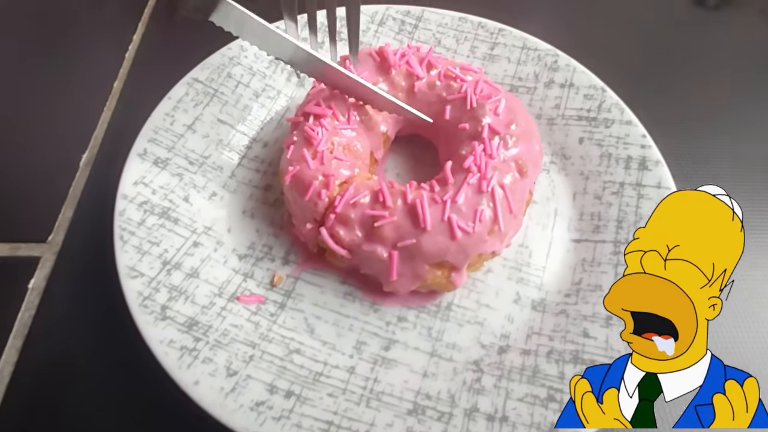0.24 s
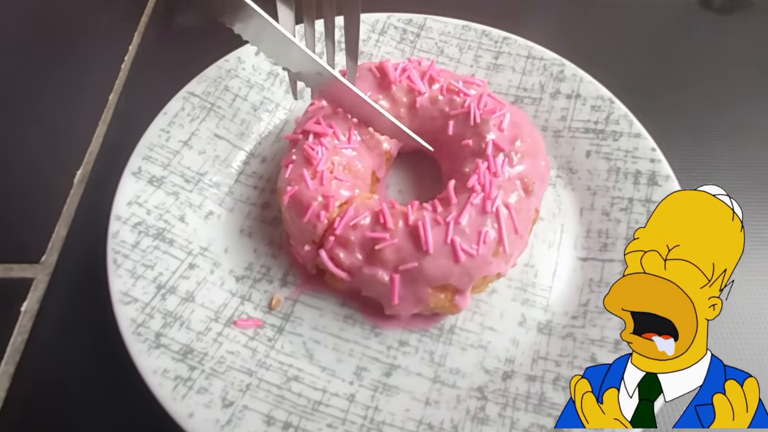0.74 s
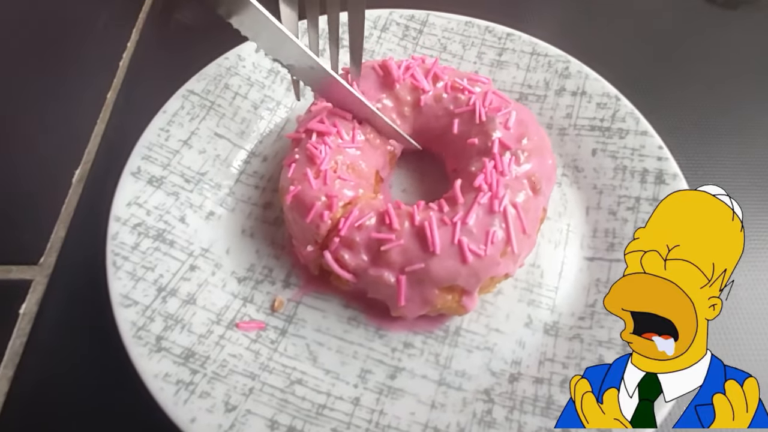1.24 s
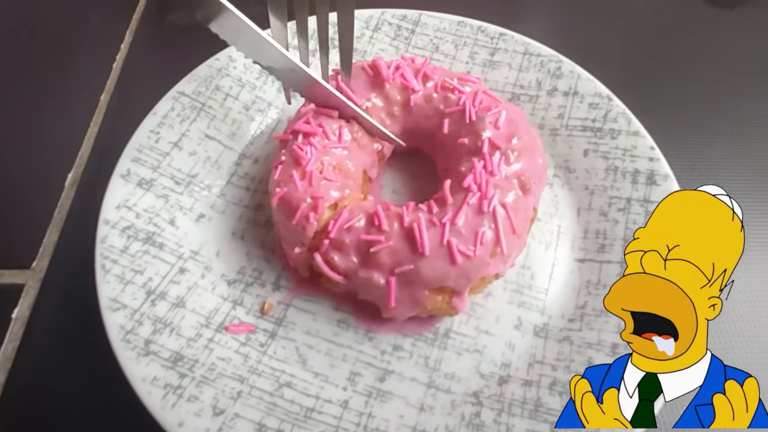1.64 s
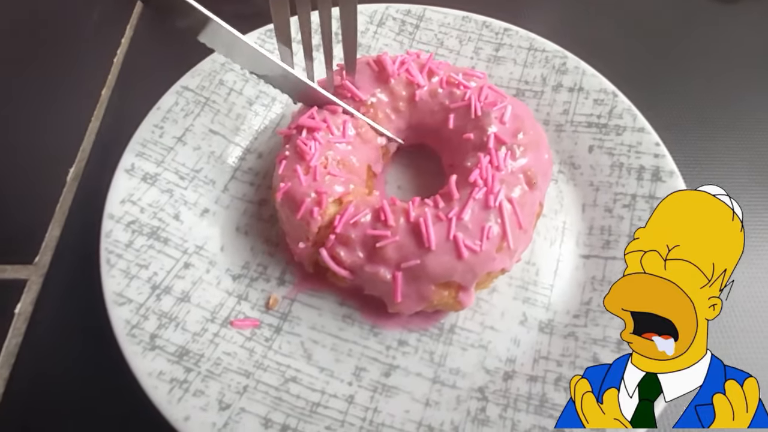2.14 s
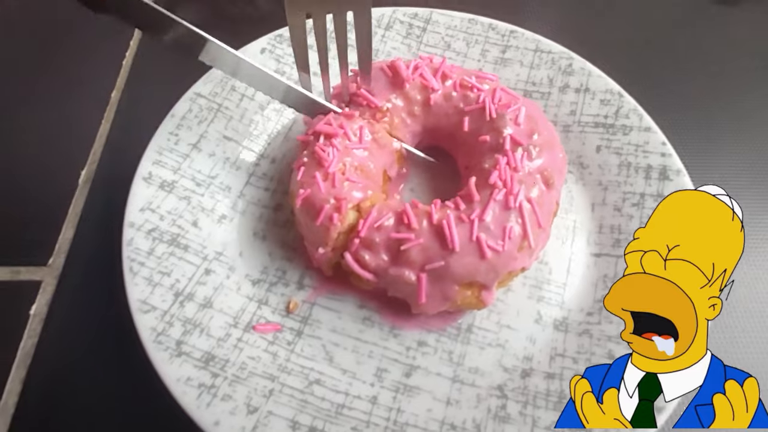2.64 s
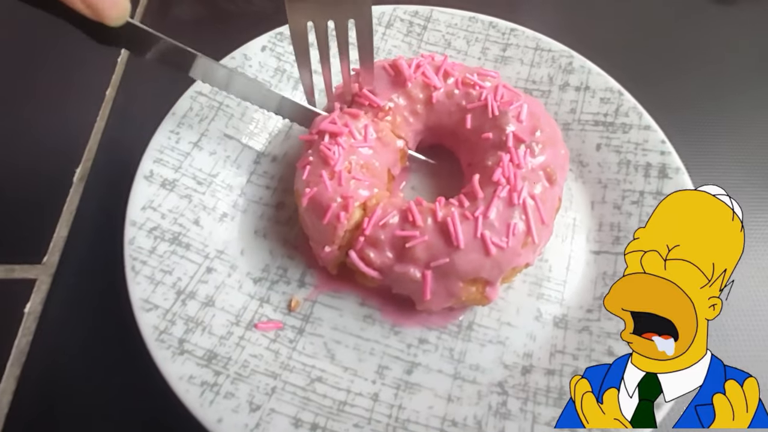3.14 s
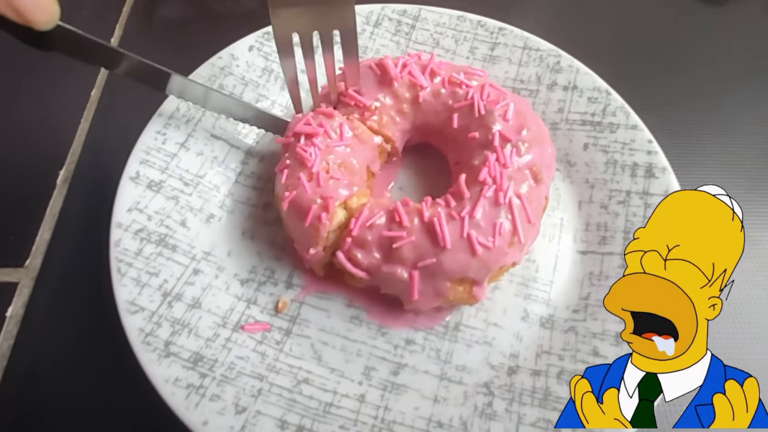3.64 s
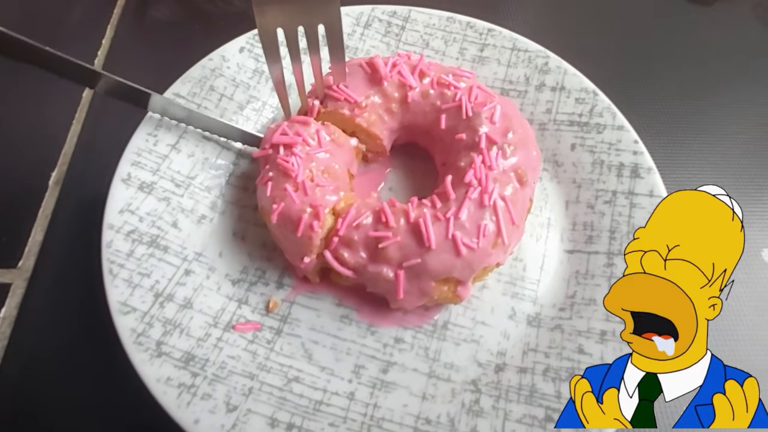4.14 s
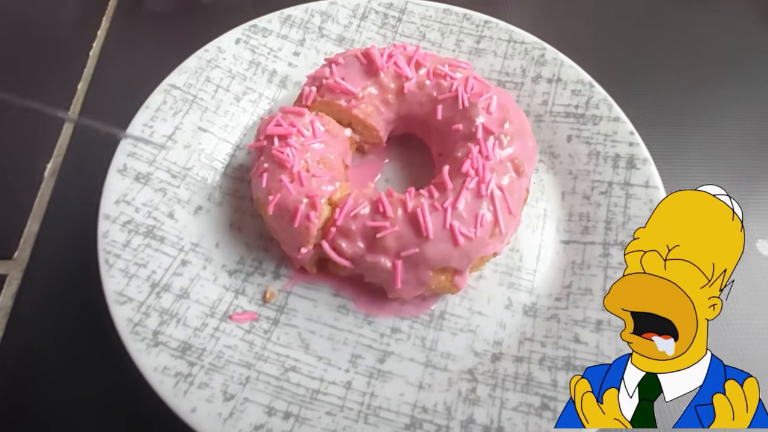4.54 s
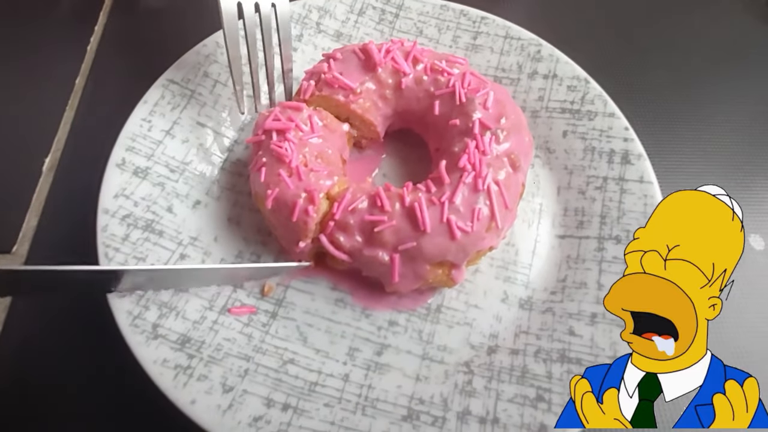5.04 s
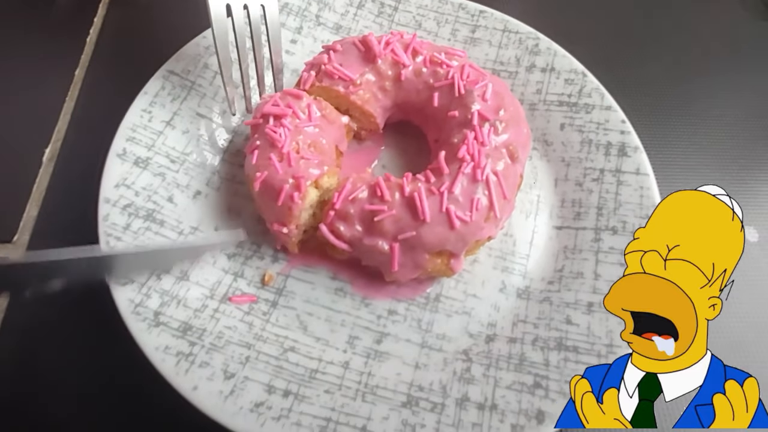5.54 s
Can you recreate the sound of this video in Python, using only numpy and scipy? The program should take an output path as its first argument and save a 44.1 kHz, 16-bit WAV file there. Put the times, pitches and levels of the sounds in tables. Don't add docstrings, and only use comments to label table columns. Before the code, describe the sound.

A knife cuts a sprinkled donut on a plate: quiet grains, a burst of brittle crunches, a loud ceramic clack, light drags, two groups of firm knocks and a bright stuttering scrape. A light ringing tap and faint metal brush end the cutting. Near microphones, short kitchen echo, low air noise with a faint distant fan.

```python
import sys
import numpy as np
from scipy import signal
from scipy.fft import rfft, irfft
from scipy.io import wavfile
from scipy.ndimage import uniform_filter1d

SR = 44100
rng = np.random.default_rng(int(sys.argv[2]) if len(sys.argv) > 2 else 0)


def to_linear_factor(level_db):
    exponent = np.asarray(level_db, float) / 20
    return 10 ** exponent


def file_out(sig):
    cols = np.atleast_2d(sig).T
    lim = np.clip(cols, -1, 1)
    pcm = np.round(lim * 32767).astype(np.int16)
    wavfile.write(sys.argv[1], SR, pcm)


N = 255339
THROUGH_S = 2.4


def rms_one(x):
    return x / np.sqrt(np.mean(x ** 2) + 1e-20)


def at_hz(points, hz):
    points_hz, values = np.transpose(points)
    return np.interp(np.log(hz), np.log(points_hz), values)


def band_pass(x, low_hz, high_hz, order=2):
    return signal.sosfilt(signal.butter(order, [low_hz, high_hz], "band", fs=SR, output="sos"), x)


def ring(push, hz, t60_s):
    r, w = to_linear_factor(-60 / (t60_s * SR)), 2 * np.pi * hz / SR
    return signal.lfilter([0, np.sin(w)], [1, -2 * r * np.cos(w), r * r], push + 1e-18)


def dying(clicks, t60_s):
    return signal.lfilter([1], [1, -to_linear_factor(-60 / (t60_s * SR))], clicks)


def spikes(times_s, heights):
    out = np.zeros(N)
    np.add.at(out, (np.asarray(times_s) * SR).astype(int), heights)
    return out


def grains(per_s, spread_db):
    sizes = to_linear_factor(spread_db * np.minimum(rng.exponential(1, N), 4)) * rng.choice([-1, 1], N)
    return rms_one(sizes * (rng.random(N) < per_s / SR))


def bunching(depth_db, size):
    return to_linear_factor(depth_db * rms_one(uniform_filter1d(rng.standard_normal(N), size=size)))


def swells(rows):
    level, top, time = np.full(N, -120.), np.zeros(N, int), np.arange(N) / SR
    for k, (s, db, rise_s, fall_s, *_) in enumerate(rows):
        before, after = (s - time) / max(rise_s, .002), (time - s) / max(fall_s, .002)
        swell = db - 20 * np.where(time < s, before, after)
        top[swell > level] = k
        level = np.maximum(level, swell)
    return level, top


def dying_noise(times_s, db, t60_s, low_hz, high_hz):
    fade = dying(spikes(times_s, to_linear_factor(db)), t60_s)
    return band_pass(fade * rng.standard_normal((2, N)), low_hz, high_hz)


def placed(x, pan_db, lag):
    late = np.interp(np.arange(len(x)) - lag, np.arange(len(x)), x, left=0)
    return np.array([x * to_linear_factor(pan_db / 2), late * to_linear_factor(-pan_db / 2)])


def coloured(pair, spectrum, leaning):
    hz = np.maximum(np.fft.rfftfreq(N, 1 / SR), 10)
    tilt_db = at_hz(leaning, hz) / 2 * [[1], [-1]]
    return rms_one(irfft(rfft(pair) * to_linear_factor(at_hz(spectrum, hz) + tilt_db), N))


def plate():
    # (time [s], level near 1 kHz [dB], clatter centre [Hz], rim ring [dB re blow],
    # hard edge [dB re blow])
    blows = [(1.616, -11.5, 917, 4, -11.5), (1.6208, -16, 1200, 1.5, -30.5), (1.633, -15, 1290, -13.5, -23),
             (2.084, -26.5, 1250, -13, -46), (2.096, -28.5, 1170, -54, -35), (2.121, -29.5, 1150, -45, -46),
             (2.434, -41.5, 1480, -35, -25), (2.611, -38.5, 1250, -7, -64), (2.62, -33, 1180, -16, -70),
             (2.93, -43, 1560, -5, -12), (3.035, -27, 1480, 3, -16), (3.0375, -13, 1480, -3, -25),
             (3.147, -26, 1240, 6, -22), (3.149, -12, 1300, -14, -42.5), (3.164, -21, 1060, -10.5, -26.5),
             (3.169, -25.5, 1180, -6.5, -45.5), (3.373, -15, 1250, -7, -19), (3.3757, -12.5, 1276, 1, -22),
             (3.382, -23.5, 1420, -21.5, -6.5), (3.411, -19, 1300, -16.5, -51),
             (3.536, -45.5, 1500, 7, -15), (3.547, -59, 1500, -8, -30), (3.802, -20, 1460, -5.5, -49),
             (3.8265, -18.5, 1310, -15, -34.5), (3.829, -15.5, 1154, -37.5, -41)]
    # (time [s], level near 1 kHz [dB], rise [s], fall [s], centre [Hz])
    presses = [(3.813, -25.5, 0.014, .02, 1450), (2.11, -59, 0.026, 0.049, 1150),
               (1.565, -45, 0.0023, 0.05, 1390), (1.597, -39.5, 0.043, 0.022, 1320),
               (1.887, -35.5, 0.025, 0.026, 1480), (1.967, -48, .004, 0.02, 1410),
               (2.442, -36, 0.025, 0.096, 1500), (2.475, -31.5, 0.084, 0.067, 1480),
               (2.51, -36.5, .015, 0.037, 1470), (2.134, -45, .02, 0.0093, 1250),
               (2.641, -44, 0.04, 0.08, 1290), (2.933, -38, 0.019, 0.045, 1500),
               (3.016, -34.5, 0.062, 0.0069, 1480), (3.19, -30, 0.0039, 0.0098, 1460),
               (3.246, -48, 0.3, 0.039, 1400), (3.804, -22, 0.0065, 0.038, 1330)]
    # (time [s], level near 2400 Hz [dB], rise [s], fall [s], 8 kHz hiss [dB re slide])
    slides = [(1.7, -33, .1, 0.13, -18), (3.2, -43.5, 0.086, 0.081, -4.5), (3.44, -28.5, 0.054, 0.12, -20),
              (3.537, -39.5, 0.014, 0.018, -5.5), (3.944, -45, .004, 0.018, 0),
              (3.972, -37, .004, 0.012, -3.5), (3.978, -33, 0.0035, 0.032, -1),
              (3.994, -37.5, .006, .02, 1), (4.004, -36, .004, 0.028, 12), (4.022, -36, .004, 0.023, -2),
              (4.033, -26.5, 0.015, 0.035, -15), (4.057, -34, .004, 0.033, -2), (4.07, -53, 0.018, 0.24, 0),
              (3.789, -36, 0.006, .02, -6), (3.827, -24.5, 0.011, 0.041, -9.5),
              (3.95, -38.5, .02, 0.16, -1.5), (3.999, -35, 0.11, 0.057, -6),
              (4.047, -31.5, 0.18, 0.024, -5.5)]
    drag_colour_db = [-7, -11, -19]
    slide_low_db, slide_mid_db, slide_hz = -21.5, -8.5, 1250

    s, db, centre_hz, rim_db, edge_db = np.transpose(blows)
    mid_db = 0.2 * rim_db + 0.36 * edge_db + 9
    (press, row), (slide, slide_row) = swells(presses), swells(slides)
    level = np.maximum(press, slide + slide_low_db)
    drag_hz = np.where(press >= level, np.array(presses)[row, -1], slide_hz)
    slide_colour_db = [0, slide_mid_db, np.array(slides)[slide_row, -1]]
    drags = [np.maximum(press + a, slide + b) for a, b in zip(drag_colour_db, slide_colour_db)]

    slips = np.abs(grains(3000, spread_db=5.0) * bunching(2.9, 400))
    rough = slips, rng.standard_normal(N), grains(2300, spread_db=-1.0)
    out = low_modes(s, db, centre_hz, level, drag_hz, rough)
    out += high_modes(s, [db + rim_db, db + mid_db, db + edge_db], drags, rough)
    out += contact(s, db + mid_db, db + edge_db)
    out = signal.sosfilt(signal.butter(4, 470, "high", fs=SR, output="sos"), out)
    worktop = dying_noise(s + 0.039, db - 16.0, 0.48, 140, 450)
    return out + worktop.mean(axis=0)


def low_modes(s, db, centre_hz, level, drag_hz, rough):
    # (mode [Hz], level [dB], t60 [s], left-right [dB])
    body = [(560, 2, 0.046, 2.5), (689, -4, 0.05, 3.5), (748, -1, 0.0066, 1), (854, -4.5, 0.06, 3.5),
            (1001, 2, 0.053, -4), (1108, -3.5, 0.06, 2.5), (1168, -5.5, 0.092, -0.5),
            (1209, -2.5, 0.08, 3.5), (1242, -4.5, 0.041, 6.5), (1300, 0.5, 0.07, -0.5),
            (1336, -0.5, 0.07, 2), (1390, -1.5, 0.056, 5.5), (1480, -0.5, 0.085, 11.5),
            (1577, -1.5, 0.045, 2.5), (1705, -2.5, 0.033, -4), (1883, -0.5, 0.023, 0)]
    out = np.zeros((2, N))
    for k, mode in enumerate(body):
        hz, sign = mode[0], (-1) ** k
        blow_db = db + pressed(hz, centre_hz, sharp_db=30.0, floor_db=-9.0 - 8.7 * (hz < 620))
        drag_db = level + pressed(hz, drag_hz, sharp_db=51.5, floor_db=-24)
        lag = 6.0 * sign * (900 < hz < 2000)
        out += fed_mode(mode, s, blow_db, drag_db, -14, .17, rough, sign=sign, lag=lag)
    return out


def pressed(hz, centre_hz, sharp_db, floor_db):
    octaves = np.log2(hz / centre_hz)
    main_db, partner_db = -sharp_db * np.abs(octaves), -sharp_db * np.abs(octaves + 0.77)
    return np.maximum(np.maximum(main_db, partner_db), floor_db)


def high_modes(s, blows_db, drags_db, rough):
    plate_hz = [2293, 2347, 2460, 2584, 2643, 3110, 3467, 3496, 3520, 3900, 4250, 4860, 6352, 6730, 7700,
                8010, 8400, 9825, 11835, 12920, 15555]
    # (level [dB], t60 [s], left-right [dB])
    plate_modes = [(-1, .25, 2), (-3, .3, 1), (-6, .025, 3), (-13, .35, 2), (-22, .25, 2), (-15, .03, 2),
                   (-13, .06, 4), (-9, .08, 4), (-11, .05, 5), (-5, .014, 1), (-5, .018, 1), (-20, .1, 2),
                   (-1, .16, 0), (-10, .015, -4), (-3, .008, -15), (-1, .2, -11), (-4, .01, -15),
                   (2, .15, -2), (-10, .1, -2), (0, .044, -2), (-15, .1, -2)]
    # (while cutting [dB], once through [dB])
    lying = [(-4, -2), (0.5, 5), (2, 0.5), (2, 3), (4.5, 12.5), (1, -3.5), (0.5, 2), (0.5, 4.5), (1, 4),
             (0, -0.5), (2, 6), (4.5, -5), (-3, -2.5), (6.5, 12), (-1.5, -2.5), (-1.5, -2), (0.5, -0.5),
             (-10.5, -6.5), (-13, -4.5), (1, -2.5), (0, 2)]
    # (time [s], peak [dB])
    catches = [
        (3.9425, -29),
        (3.962, -36),
        (3.9712, -30),
        (3.9766, -30),
        (3.992, -33),
        (4.0044, -30),
        (4.021, -29),
        (4.0336, -24),
        (4.041, -25.5),
        (4.057, -33),
    ]
    # catch [dB], rattle [dB], rattle t60 [s]
    catch_group_db, rattle_group_db, rattle_s = [-6, -8.5, -3], [-12, -20, -12], [.16, .08, .12]
    # skid's loss on long rings [dB], ring time left under the resting blade [ratio]
    skid_long_db, resting = [-6, -20, 0], [0.28, 1, 1]
    skid_s, skid_short_db, skid_top_db, top_hz = 3.9, -0.5, -9, 9000
    long_s, stiff_hz, stiff_db, catch_stiff_db = .045, 11000, -9, -15
    sing_hz, sing_db = 6350, 5

    time = np.arange(N)
    skid, through = time / SR > skid_s, time > int(THROUGH_S * SR)
    catch_s, catch_db = np.transpose(catches)
    out = np.zeros((2, N))
    for hz, (mode_db, t60_s, pan_db), (cutting_db, lying_db) in zip(plate_hz, plate_modes, lying):
        group = int(hz > 2800) + int(hz > 5500)
        is_long, is_stiff = t60_s > long_s, hz > stiff_hz
        blow_db = blows_db[group] + np.where(s > THROUGH_S, lying_db, cutting_db)
        skid_db = (skid_long_db[group] if is_long else skid_short_db) + skid_top_db * (hz > top_hz)
        drag_db = drags_db[group] + skid * skid_db + stiff_db * is_stiff
        drag_db = drag_db + np.where(through, lying_db, cutting_db)
        rattle_db = rattle_group_db[group] + stiff_db * is_stiff
        if abs(hz - sing_hz) < 200:
            blow_db, drag_db = blow_db + sing_db * (s > THROUGH_S), drag_db + sing_db
        caught_db = catch_db + mode_db + catch_group_db[group] - 15.3 * is_long + catch_stiff_db * is_stiff
        out += fed_mode((hz, mode_db, t60_s, pan_db), s, blow_db, drag_db, rattle_db, rattle_s[group], rough,
                        caught=spikes(catch_s, to_linear_factor(caught_db)), left=resting[group] if is_long else 1,
                        scattered=not is_long)
    return out


def fed_mode(mode, s, blow_db, drag_db, rattle_db, rattle_s, rough,
             sign=1, lag=0, caught=0, left=1, scattered=True):
    hz, mode_db, t60_s, pan_db = mode
    slips, noise, rattle = rough
    contact_s = .0012
    uneven, late = rng.standard_normal((2, len(s)))
    hits = spikes(s + contact_s * np.abs(late) * scattered, to_linear_factor(blow_db + mode_db - 4.0 + 1.8 * uneven))
    chatter = to_linear_factor(rattle_db) * dying(hits, rattle_s)
    drag = uniform_filter1d(to_linear_factor(drag_db + mode_db - 3.5), size=100)
    turn = rng.integers(N)
    fed = chatter * np.roll(rattle, turn) + drag * slips * np.sign(np.roll(noise, turn))
    fed = fed / np.sqrt(t60_s * SR / 14)
    push = sign * hits + fed + caught
    through = int(THROUGH_S * SR)
    tone = np.concatenate([ring(push[:through], hz, t60_s), ring(push[through:], hz, left * t60_s)])
    return placed(tone, pan_db, hz / 400 * rng.random() + lag)


def contact(s, mid_db, edge_db):
    out = dying_noise(s, mid_db + 10.0, 0.013, 1900, 2100)
    out += dying_noise(s, mid_db - 2.5, 0.1, 2100, 2800)
    out += dying_noise(s, mid_db - 15.0, 0.15, 3300, 3900)
    out += dying_noise(s, edge_db - 5.0, 0.012, 6300, 9500)
    return out + dying_noise(s, mid_db - 6.5, 0.026, 3700, 4500)


def rim_tap():
    # (time [s], level [dB], left-right [dB])
    tap = [
        (4.2872, -30.5, 0),
    ]
    rim_hz = [570, 1190, 1346, 2320, 3499, 3106, 4850, 6347, 6934, 8010, 9819, 11830, 12720]
    # (level [dB], t60 [s], left-right [dB], right lag [samples])
    rim = [(-20, 0.098, 2, -1), (-15, 0.23, 5, -7), (-25.5, 0.21, 4, 3), (-1, 0.26, 4, 0.3),
           (4, 0.16, 8.5, 7.5), (-32, 0.3, 6, -1), (-5.5, 0.13, 0, 1.5), (-7.5, 0.15, 9, 1.2),
           (-24, .09, 3, 0), (-16, 0.25, -15, 2.6), (-35, 0.2, -3, 4), (-18, 0.13, -3, 1.5),
           (-28, 0.1, -3, 5)]
    (s, db, pan_db), = tap
    out = dying_noise([s], db + 6.0, 0.032, 3600, 4200) + dying_noise([s], db - 12.0, 0.23, 4200, 7400)
    for k, (hz, (mode_db, t60_s, lean_db, lag)) in enumerate(zip(rim_hz, rim)):
        tone = ring(spikes([s], to_linear_factor(db + mode_db)), hz, t60_s)
        out += placed((-1) ** k * tone, pan_db + lean_db, lag)
    return out


def glaze():
    # (time [s], crackle [dB], rise per 20 dB [s], fall per 20 dB [s])
    crumble = [(0.04, -62, 0.041, 0.18), (0.1, -70, .1, 0.64), (0.89, -52.5, 0.026, 0.11),
               (.94, -51.5, 0.1, 0.07), (1.1, -59, .02, 0.34), (1.17, -56.5, 0.15, 0.061),
               (1.32, -42.5, 0.017, 0.21), (1.4, -42, 0.09, 0.074), (1.45, -48, .05, 0.024),
               (1.48, -40, 0.014, 0.011), (1.64, -60.5, 0.009, 0.32), (1.79, -51, 0.027, 0.093),
               (2.0, -54, .22, 0.022), (2.16, -55.5, 0.18, 0.084), (2.3, -60.5, 0.11, 0.14),
               (2.5, -60, 0.2, 0.1), (2.66, -62.5, 0.058, 0.23), (2.82, -65, 0.046, 0.22),
               (3.08, -51.5, 0.15, 0.34), (3.39, -56, 0.03, 0.24), (3.64, -56.5, 0.42, 0.12),
               (3.83, -48, .09, 0.061), (4.05, -47.5, 0.066, 0.104), (4.29, -57, 0.025, 0.2),
               (4.36, -68, 0.14, 0.098), (4.74, -74, 0.022, 0.58), (5.51, -61.5, 0.17, 0.081),
               (5.75, -74, 0.73, 0.26)]
    # (frequency [Hz], density [dB per Hz])
    crackle = [(60, -34), (300, -6.5), (880, -5), (1500, -10.5), (2200, -4.5), (2910, -11), (3120, -32),
               (3370, -11), (5300, -13.5), (7510, -7), (10800, -13.5), (12700, -7.5), (15900, -19.5)]
    # (frequency [Hz], left-right [dB])
    sugar_leaning = [(60, -1.5), (130, -3), (290, -8.5), (640, 5), (1410, 4), (3100, -5), (6820, -8),
                     (15000, -9.5)]
    # (time [s], peak [dB], pitch
    # [Hz], dull push [dB])
    cracks = [(0.033, -34, 8950, -52), (0.041, -51, 8800, -60), (0.05, -50, 8900, -60),
              (0.765, -65, 8000, -42), (0.863, -47, 8000, -55), (0.8764, -52, 7690, -32),
              (0.8929, -37, 7850, -26), (0.9046, -41, 8000, -26), (0.9148, -36, 9700, -27),
              (0.9386, -39, 8100, -52), (0.963, -49, 7550, -43), (1.098, -48, 7500, -51),
              (1.1285, -40, 8100, -30), (1.1414, -37, 8600, -40), (1.1584, -40.5, 7570, -38),
              (1.1783, -36, 7780, -48), (1.3126, -34, 7870, -25), (1.315, -29, 7800, -36),
              (1.3195, -36, 7710, -35.5), (1.327, -36.5, 12150, -33), (1.3328, -38.5, 7810, -21),
              (1.3512, -33.5, 7580, -6), (1.362, -25.5, 12460, -17), (1.3664, -30, 7770, -44),
              (1.3821, -17, 12470, -34.5), (1.4038, -11, 12000, -18), (1.4366, -25, 12500, -35.5),
              (1.4594, -30, 8100, -36.5), (1.477, -23.5, 8140, -42), (1.966, -32, 4700, -39),
              (4.7256, -42, 10200, -67), (4.75, -56.5, 9000, -68), (4.788, -45.5, 9300, -69),
              (4.8773, -47, 10400, -65), (5.504, -52, 8600, -60), (5.516, -48, 8600, -58)]
    # (time [s], peak [dB], dull push [dB])
    sprinkles = [(1.272, -41, -42.5), (1.5496, -47, -86.5), (1.775, -30, -27.5), (1.7947, -38, -41),
                 (1.9072, -39, -32), (2.26, -47, -41.5), (2.3004, -49, -41), (2.643, -51, -51),
                 (3.6487, -45, -49), (4.8544, -49, -47), (5.5101, -42, -46), (5.696, -44, -44)]
    # (time [s], dull push [dB])
    slumps = [
        (.926, -21),
        (1.339, -26.5),
        (1.3645, -11),
        (1.368, -11),
        (1.412, -25.5),
        (1.446, -26.5),
    ]
    sprinkle_hz, slump_tick_db = 8100, -42

    pair = placed(grains(1800, spread_db=2.0), 0, 4.5) + 1.1 * rng.standard_normal((2, N))
    pair = bunching(2.5, 250) * pair
    out = to_linear_factor(swells(crumble)[0] + 5.5) * coloured(pair, crackle, sugar_leaning)

    small = [(s, db, sprinkle_hz, push_db) for s, db, push_db in sprinkles]
    small += [(s, slump_tick_db, sprinkle_hz, push_db) for s, push_db in slumps]
    push, tick, time = np.zeros(N), np.zeros((2, N)), np.arange(1000) / SR
    for s, db, hz, push_db in cracks + small:
        span = slice(int(s * SR), int(s * SR) + 1000)
        noise, detune = rng.standard_normal(1000), rng.standard_normal()
        burst = (0.55 * noise + np.sin(2 * np.pi * hz * time)) * to_linear_factor(-60 * time / 0.0061)
        tick[:, span] += to_linear_factor(db + 2.0) * placed(burst, at_hz(sugar_leaning, hz) - 2.5, 5.5)
        swing = np.sin(2 * np.pi * 620 * (1 + 0.094 * detune) * time) + 1.4 * noise
        push[span] += to_linear_factor(push_db - 6.0 - 60 * time / 0.016) * swing
    bright, dull = band_pass(tick, 4600, 15500), band_pass(push, 400, 3100)
    return out + bright + placed(dull, 3.0, 5.4)


def dough():
    # (time [s], level [dB], rise [s], fall [s])
    squeeze = [
        (.9, -42, 0.035, 0.051),
        (.95, -40.5, 0.08, 0.0076),
        (1.16, -44, 0.077, 0.0484),
        (1.356, -32.5, 0.016, 0.037),
        (1.404, -29.5, 0.00623, 0.017),
        (1.442, -46.5, .04, .04),
        (1.97, -49.5, 0.14, 0.1),
        (2.3, -53.5, 0.16, 0.073),
    ]
    modes = [(196.0, -6, 0.0762), (160.8, -20.5, 0.038), (322.2, 8.5, 0.016), (540, 4.5, 0.052),
             (710, 2, 0.029), (875, -10, 0.0201), (1500, -4.0, 0.0063), (2284, -8.0, 0.006)]
    lumps = np.diff(grains(1200, spread_db=1.5), prepend=0)
    dull = sum(to_linear_factor(db) * rms_one(ring(lumps, hz, t60_s)) for hz, db, t60_s in modes)
    level = uniform_filter1d(to_linear_factor(swells(squeeze)[0]), size=300)
    return placed(rms_one(dull) * level, 2.6, 3.8)


def knife():
    # (mode [Hz], level [dB], t60 [s])
    blade = [(8700, -64.5, 0.026), (11080, -65, .015), (12700, -61, 0.028)]
    # (time [s], level [dB], rise [s], fall [s])
    strokes = [
        (4.4, -2.5, 0.038, 0.03),
    ]
    brush = to_linear_factor(swells(strokes)[0]) * rng.standard_normal(N)
    tone = sum(to_linear_factor(db) * ring(brush, hz, t60_s) / np.sqrt(t60_s * SR / 28) for hz, db, t60_s in blade)
    return placed(tone, -20.0, 5.0)


def counter():
    # (time [s], peak [dB])
    thuds = [
        (0.931, -39),
        (1.157, -44.5),
        (1.371, -46),
        (1.627, -30),
        (2.101, -48.5),
        (3.042, -42.5),
        (3.16, -37.5),
        (3.389, -38),
        (3.812, -45.5),
    ]
    s, db = np.transpose(thuds)
    return ring(ring(spikes(s, to_linear_factor(db - 45.5)), 190, 0.14), 208, 0.56)


def kitchen(x):
    t60_s, cut_hz = 0.32, 3380
    time = np.arange(SR // 2) / SR
    tail = rng.standard_normal((2, len(time))) * to_linear_factor(-60 * time / t60_s) * (time > .004)
    tail = band_pass(tail, 300, cut_hz)
    return signal.fftconvolve(x, tail / np.sqrt(np.sum(tail ** 2) / 2), axes=1)[:, :N]


def room_tone():
    # (frequency [Hz], density [dB per Hz])
    air = [(13, -62), (22, -23), (59, -3.5), (150, 3), (247, -2.5), (268, -1.5), (343, -5.5), (782, -18),
           (1550, -15), (1930, -7.5), (2480, -23.5), (3300, -26), (5600, -29), (6500, -32), (7430, -35.5),
           (10100, -32), (15600, -32.5)]
    # (frequency [Hz], correlation [ratio])
    likeness = [(60, 0.7), (180, 0.94), (550, 0.34), (1650, -1.2), (4970, -0.23), (15000, -0.67)]
    # (frequency [Hz], left-right [dB])
    leaning = [(30, -1), (60, 3), (150, -4.5), (380, -0.5), (950, -0.5), (2380, -5.5), (5980, -7),
               (15000, -15)]
    # (centre [Hz], width [Hz], level [dB], left-right [dB]); a fan's whine near 2 kHz, and a hiss
    # near 8 kHz that the brighter right microphone lifts
    steady_bands = [(1959, 150, -65, -5), (8000, 1508, -73, -17.5)]
    # (time [s], level [dB])
    drift = [(0.0, -92), (0.42, -72), (0.79, -62), (1.11, -94.5), (1.84, -68), (2.24, -85), (2.47, -94),
             (2.64, -52.5), (3.321, -57), (3.55, -70), (3.79, -46), (3.93, -90), (4.09, -86.5),
             (4.561, -101), (5.79, -84.5)]
    air_db = -57.5

    sides = np.array([[1], [-1]])
    mid, side = rfft(rng.standard_normal((2, N)))
    alike = np.clip(at_hz(likeness, np.maximum(np.fft.rfftfreq(N, 1 / SR), 10)), 0, 1)
    pair = irfft(np.sqrt(1 + alike) * mid + np.sqrt(1 - alike) * side * sides, N)
    out = to_linear_factor(air_db) * coloured(pair, air, leaning)
    for hz, width_hz, db, pan_db in steady_bands:
        hum = band_pass(pair[:, ::-1], hz - width_hz / 2, hz + width_hz / 2, order=3)
        out += to_linear_factor(db + pan_db / 2 * sides) * rms_one(hum)
    whine_db = np.interp(np.arange(N) / SR, *np.transpose(drift)) - 12.5
    return out + to_linear_factor(whine_db) * rms_one(band_pass(pair, 2700, 2950))


def scene():
    near, tap = plate() + glaze() + dough() + counter(), rim_tap()
    echo_db = -12
    return near + tap + knife() + to_linear_factor(echo_db) * kitchen(near + tap / 4) + room_tone()


def band_limit(x):
    return signal.sosfilt(signal.butter(12, 16800, fs=SR, output="sos"), x)


def record(dry):
    cutoff_hz, top_shelf_hz = 16600, 15950
    mix = .99 * np.tanh(dry / .99)
    mix = signal.sosfilt(signal.cheby2(20, 60, cutoff_hz, fs=SR, output="sos"), mix)
    mix = signal.sosfilt(signal.cheby2(12, 25, top_shelf_hz, fs=SR, output="sos"), mix)
    return band_limit(mix)


dry = scene()
out = record(dry)
file_out(out)
```